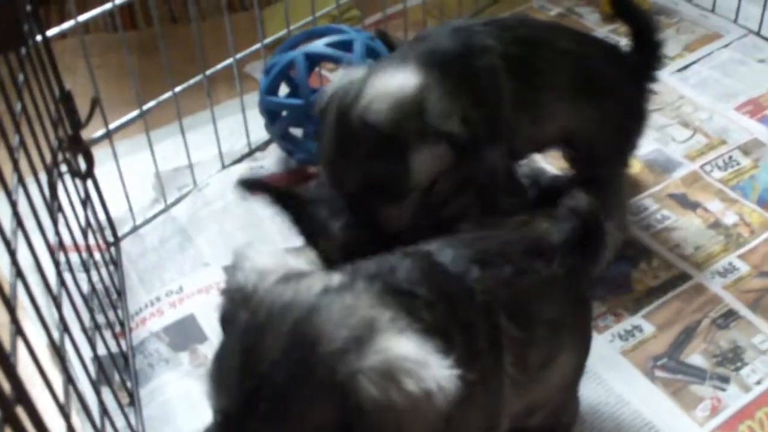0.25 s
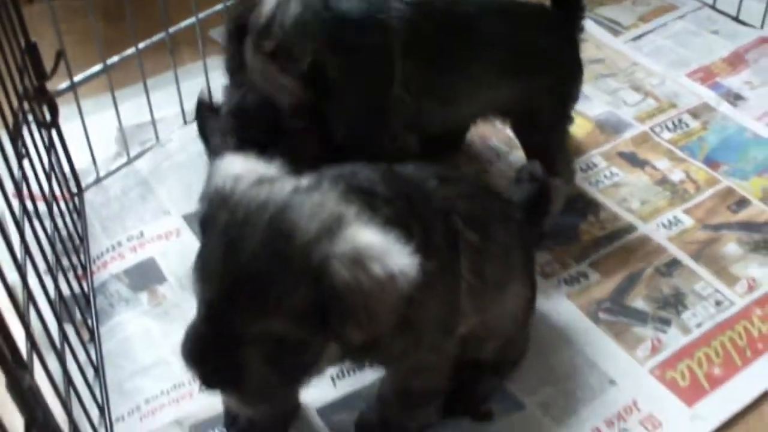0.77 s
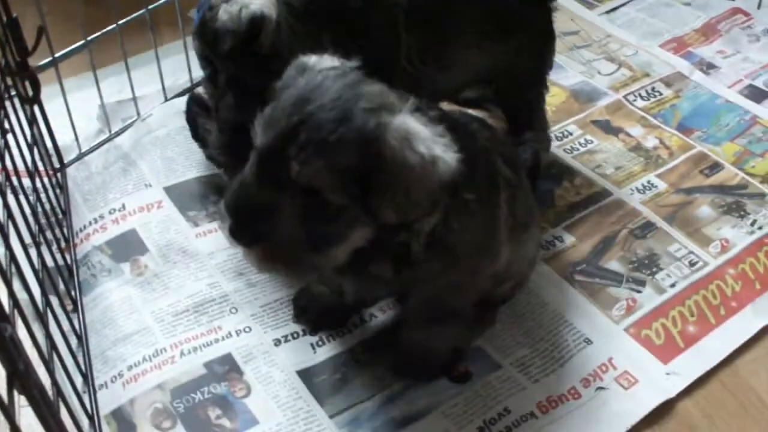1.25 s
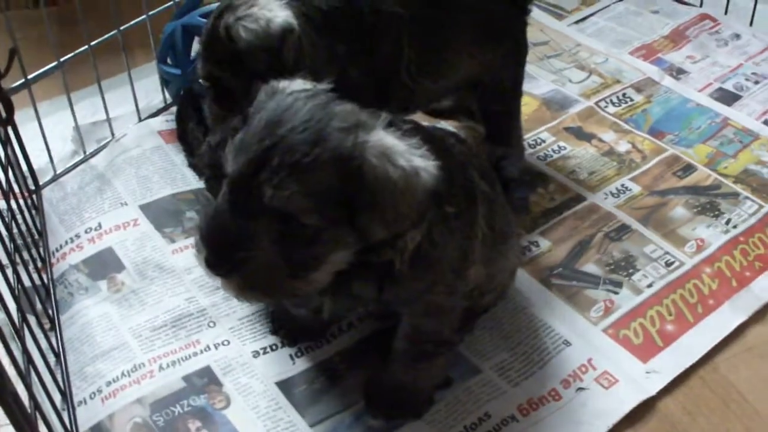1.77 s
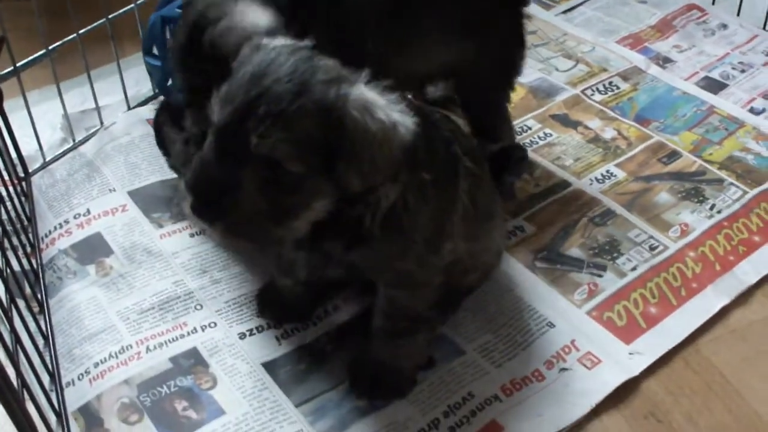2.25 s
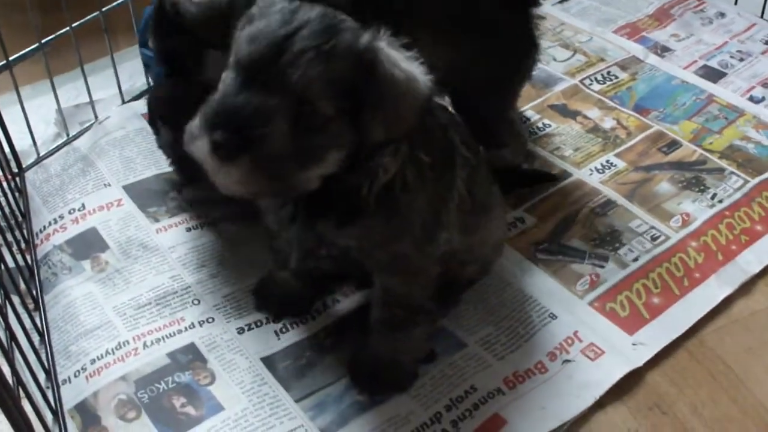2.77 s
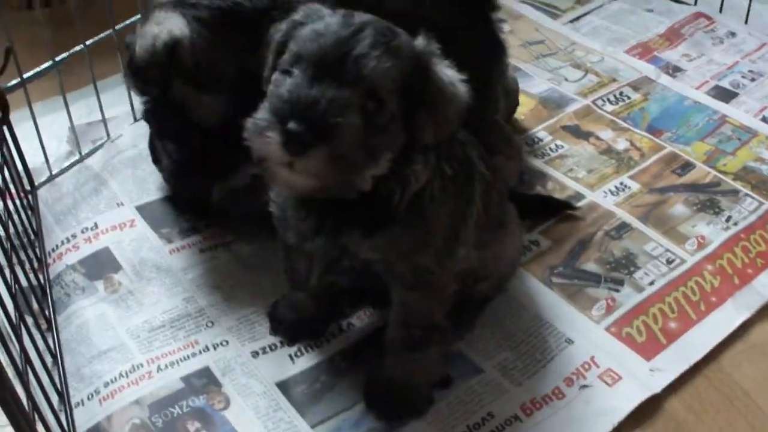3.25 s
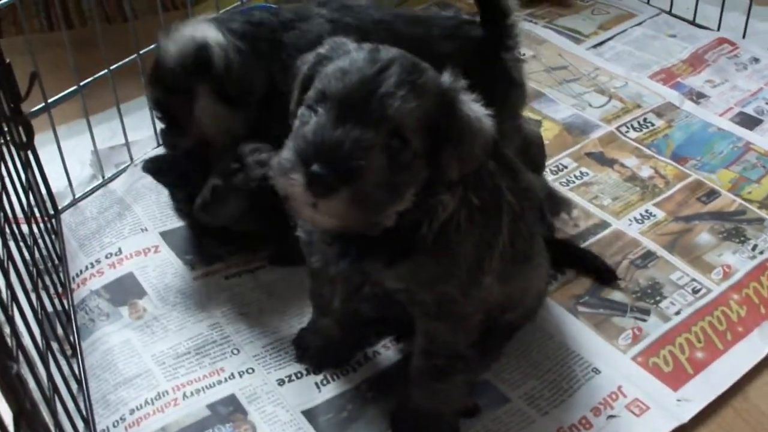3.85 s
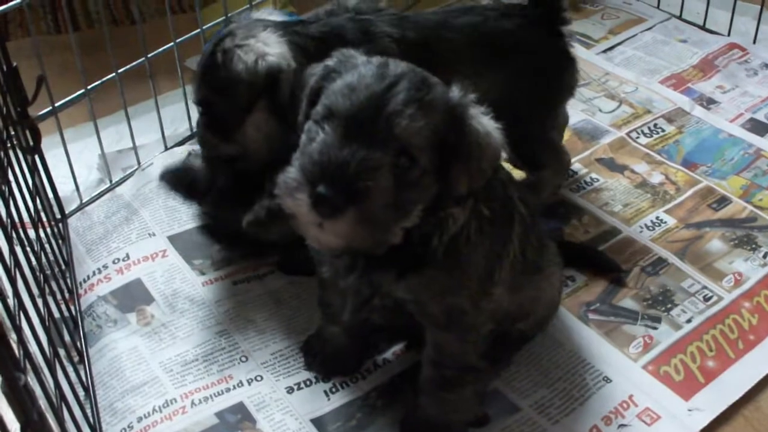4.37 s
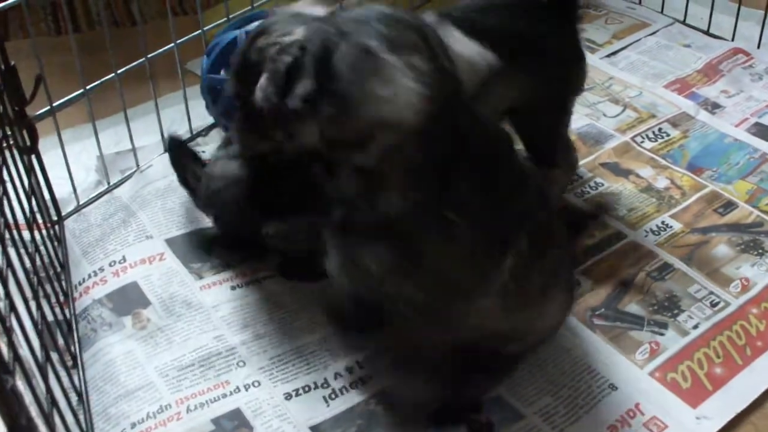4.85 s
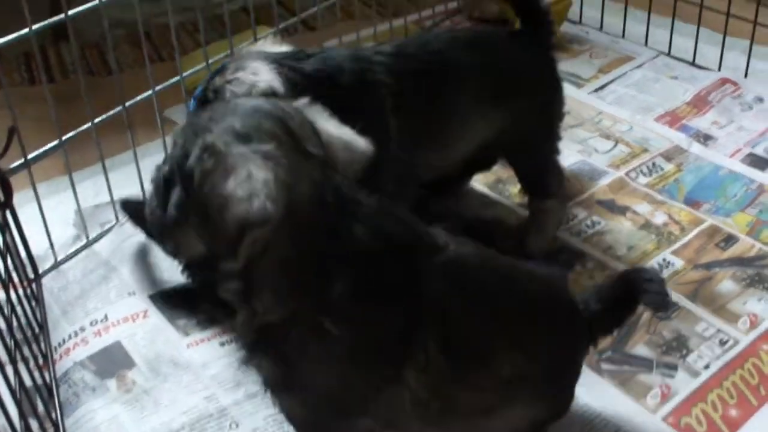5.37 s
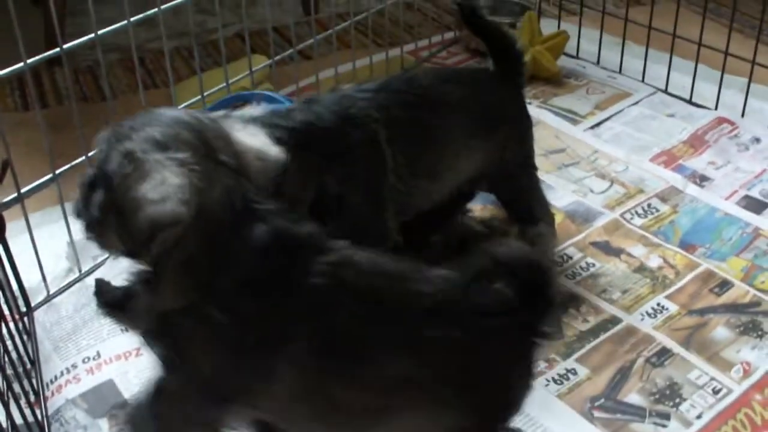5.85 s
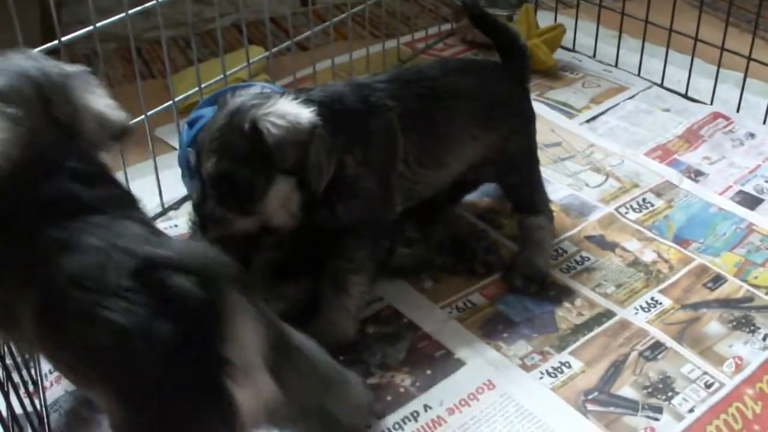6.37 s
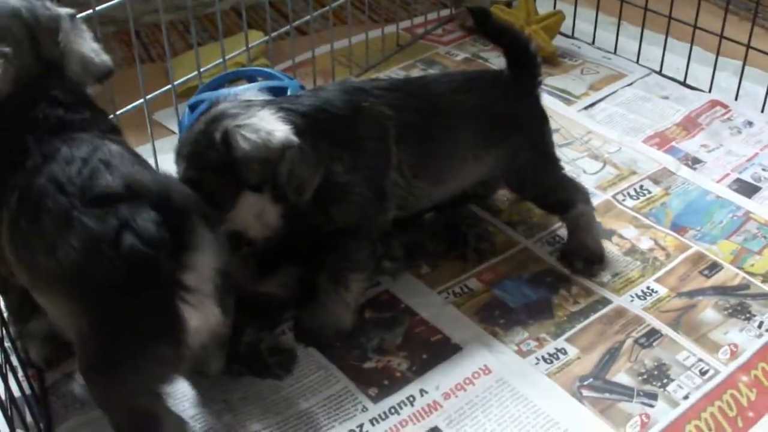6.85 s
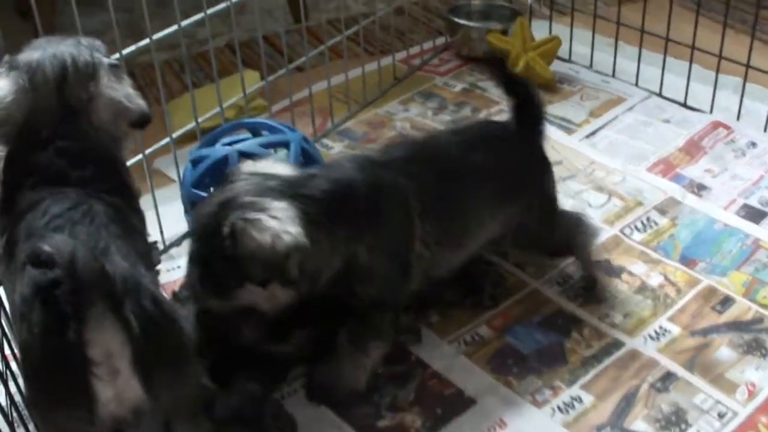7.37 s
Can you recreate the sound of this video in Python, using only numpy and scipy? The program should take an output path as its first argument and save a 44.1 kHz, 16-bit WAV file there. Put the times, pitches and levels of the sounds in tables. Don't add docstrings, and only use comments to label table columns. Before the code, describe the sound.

Steady soft hiss with a barely audible high whine runs throughout, from a small stereo camera in a small hard-floored room. At 0 to 0.4 seconds, light claw ticks and paper rustle; more ticks and scuffing around 0.8 to 1.0. A puppy's thin squeal jumps up in pitch at 1.25, wavers and turns rough by 1.5. Quiet paper sounds follow, with claw ticks and a paw knock near 2.3. A tiny rough squeal comes at 2.7. Paper crinkles from 3.0, strongest near 3.7, with small taps around 4. A sharp, bright yelp at 4.65 is followed by a lower, breathier one at 5.03. A distinct paper scuff sounds at 5.4. From 5.9 paws knock more often; a short hoarse yelp falls at 6.2. Quick knocks, ticks and drags continue through 7.1, ending with crisp crinkles at 7.35 and 7.6.

```python
import sys
import numpy as np
from scipy import signal
from scipy.fft import rfft, irfft
from scipy.io import wavfile
from scipy.ndimage import uniform_filter1d

SR = 44100
rng = np.random.default_rng(int(sys.argv[2]) if len(sys.argv) > 2 else 0)


def level_to_linear(level):
    exponent = np.asarray(level, float) / 20
    return 10 ** exponent


def to_wav(s):
    ch = np.atleast_2d(s).T
    pcm = np.round(np.clip(ch, -1, 1) * 32767)
    wavfile.write(sys.argv[1], SR, pcm.astype(np.int16))


N = 335452
TIME = np.arange(N) / SR

# (frequency [Hz], density [dB per Hz])
MOUTH = [(2500, 5), (3500, -19), (4500, -1.5), (5500, 3), (6500, 7.5), (7500, -1.5), (9000, -4.5),
         (11500, -14), (14000, -43)]
# (low [Hz], high [Hz])
SCUFF_BANDS = [(220, 1100), (900, 1800), (1600, 2900), (3800, 11800)]


def rms_one(x):
    return x / np.sqrt(np.mean(x ** 2) + 1e-20)


def at_hz(points, hz):
    points_hz, points_db = np.transpose(points)
    return np.interp(np.log(hz), np.log(points_hz), points_db)


def band(x, low_hz, high_hz):
    return signal.sosfilt(signal.butter(2, [low_hz, high_hz], "band", fs=SR, output="sos"), x)


def coloured(white, spectrum):
    hz = np.fft.rfftfreq(N, 1 / SR) + 1
    return irfft(rfft(white) * level_to_linear(at_hz(spectrum, hz)), N)


def drift(rate_hz, size):
    pole = np.exp(-2 * np.pi * rate_hz / SR)
    white = rng.standard_normal(size + 4000)
    return rms_one(signal.lfilter([1], [1, -2 * pole, pole * pole], white)[4000:])


def puppies():
    # (time [s], pitch [Hz], fundamental [dB], overtones let out by the open mouth [dB])
    long_squeal = [(1.238, 827, -60, -76), (1.249, 855, -44.5, -63), (1.259, 1099, -42.5, -59.5),
                   (1.275, 1151, -35.5, -52), (1.298, 1173, -46.5, -57), (1.35, 1134, -30, -49.5),
                   (1.422, 1127, -35.5, -54), (1.436, 1069, -37.5, -51.5), (1.512, 1085, -40.5, -54.5)]
    short_squeal = [(2.7, 1310, -53, -72), (2.712, 1314, -45, -50), (2.723, 1243, -38, -51.5),
                    (2.736, 1128, -34.5, -50), (2.745, 1207, -36, -47), (2.757, 1250, -35.5, -56),
                    (2.763, 1200, -52, -54), (2.772, 1210, -53, -66)]
    sharp_yelp = [(4.649, 1578, -60, -70), (4.656, 1565, -28.5, -58), (4.66, 1513, -33, -50),
                  (4.665, 1275, -41, -44), (4.692, 1264, -31.5, -39.5), (4.712, 1346, -40, -45.5),
                  (4.727, 1297, -28, -46), (4.735, 1155, -41, -56), (4.739, 1250, -56, -69)]
    low_yelp = [(5.027, 1100, -52, -60), (5.033, 1036, -38.5, -62), (5.038, 845, -42, -56),
                (5.044, 811, -37.5, -53.5), (5.061, 799, -40, -53), (5.066, 848, -36, -60),
                (5.073, 970, -59, -62)]
    falling_yelp = [(6.192, 1113, -62, -66), (6.196, 1127, -38.5, -71), (6.207, 979, -36, -50),
                    (6.221, 836, -41.5, -55.5), (6.235, 938, -44, -59), (6.244, 884, -40.5, -62),
                    (6.249, 890, -64, -82)]
    brightness_db = [
        1,
        -0.5,
        -6.5,
        3,
        -2,
    ]
    # (share while folds close [0-1], share once they tire [0-1], tiring time [s])
    breaths = [
        (.12, .4, 1.4),
        (.3, .5, 2.69),
        (.15, .35, 4.69),
        (.7, .8, 5.02),
        (.75, .85, 6.19),
    ]
    breath_noise = rms_one(coloured(rng.standard_normal(N), [(1500, -1)] + MOUTH))
    hoarse = rms_one(band(rng.standard_normal(N), 1510, 2340))
    chance = np.array([throb(), drift(160, N), drift(99, N), hoarse])
    calls = long_squeal, short_squeal, sharp_yelp, low_yelp, falling_yelp
    out = np.zeros(N)
    for rows, bright_db, breath in zip(calls, brightness_db, breaths):
        out += call(rows, bright_db, breath, breath_noise, chance)
    return out


def call(rows, bright_db, breath, breath_noise, chance):
    # (time [s], length [s], pitch drop [Hz], level drop [dB])
    dips = [
        (1.312, 0.01, -2, 10.5),
        (1.38, .01, 26, 7.5),
        (1.409, 0.0078, 10.5, 5),
        (1.466, .018, 35.5, 1),
        (1.503, 0.0039, 35, 20),
        (2.745, 0.0038, 12, 11),
        (6.234, 0.0052, 28, 6),
    ]
    # (frequency [Hz], level over overtones [dB])
    second_boost = [(1600, 8.5), (2300, 2.5), (2560, -7), (2700, -19.5)]
    release_s, attack_s, tiring_s = 0.0092, 0.0055, 0.07
    s, *columns = np.transpose(rows)
    span = slice(int(s[0] * SR), int((s[-1] + 4 * release_s) * SR))
    t = TIME[span]
    swing, waver, flicker, hoarse = chance[:, span]

    pitch_hz, first_db, open_db = [np.interp(t, s, c) for c in columns]
    for when_s, length_s, drop_hz, drop_db in dips:
        dip = np.exp(-((t - when_s) / length_s) ** 2)
        pitch_hz = pitch_hz - drop_hz * dip
        first_db = first_db - drop_db * dip
    second_db = open_db + at_hz(second_boost, 2 * pitch_hz)
    upper_db = open_db + bright_db
    closing_share, tired_share, tires_s = breath
    breathy = np.interp(t, [tires_s, tires_s + tiring_s], [closing_share, tired_share])
    pitch_hz = uniform_filter1d(pitch_hz, size=90) * (1 + 0.02 * breathy * waver)
    phase = 2 * np.pi * np.cumsum(pitch_hz) / SR
    shimmer = level_to_linear(3 * breathy * flicker)

    first = level_to_linear(first_db) * np.sin(phase) * (1 + 0.43 * swing)
    second = level_to_linear(second_db + 8.5) * np.sin(2 * phase + 2.8) * (1 + swing)
    gains = [level_to_linear(at_hz(MOUTH, k * pitch_hz)) for k in range(3, 13)]
    upper = sum(g * np.sin(k * phase + k * k * 0.418) for k, g in enumerate(gains, 3))
    upper = upper / np.sqrt(sum(g ** 2 for g in gains[2:]) / 2)
    puffs = breath_noise[span] * (1 + 0.6 * np.sin(phase))
    top = np.sqrt(1 - breathy) * upper * (1 + 0.61 * swing) + np.sqrt(breathy) * puffs
    top = level_to_linear(upper_db + 1.0) * top
    rasp = level_to_linear(second_db + 0.5) * breathy * hoarse

    attack = np.clip((t - t[0]) / attack_s, 0, 1)
    release = np.exp(-np.maximum(t - s[-1], 0) / release_s)
    out = np.zeros(N)
    out[span] = (np.sqrt(2) * (first + second) * shimmer + top + rasp) * attack * release
    return out


def throb():
    # (start [s], end [s], throb [Hz], depth [0-1])
    flutter = [
        (1.437, 1.53, 86, 0.37),
        (2.707, 2.743, 283.8, 0.68),
        (4.661, 4.697, 470, 0.5),
        (6.194, 6.25, 204, 0.2),
    ]
    swing = np.zeros(N)
    for start_s, end_s, hz, depth in flutter:
        fade = np.clip(np.minimum(TIME - start_s, end_s - TIME) / 0.0033, 0, 1)
        phase = 2 * np.pi * np.cumsum(hz * (1 + 0.15 * drift(60, N))) / SR
        swing += depth * fade * np.sin(phase)
    return swing


def taps():
    # (low [Hz], high [Hz], t60 [s], first contact over rattle [ratio])
    parts = [
        (250, 1000, .025, 6),
        (900, 2700, .009, 9),
        (5200, 10500, .007, 2),
    ]
    # (time [s], tick [dB], left-right [dB])
    claws = [(0.032, -47, -2), (0.1308, -39.5, -3), (0.1406, -40.5, -8), (0.1824, -47, -3),
             (0.1882, -43, -3), (0.8466, -45, -1), (2.2482, -39, -5), (2.261, -40.5, -1), (3.954, -40, -4),
             (4.5383, -48, -7), (4.8445, -47, 5), (5.937, -41.5, -1), (6.706, -42, 0), (7.0591, -34.5, 11),
             (7.152, -52, 0)]
    # (time [s], knock [dB], weight [dB], claw [dB])
    paws = [(0.0946, -51, 10.5, -1), (0.8157, -39.5, -1.5, -9), (0.8973, -50, 11.5, -10.5),
            (1.1598, -45, 0, 2), (2.308, -48, 2, -7), (3.9729, -49, 10, -8), (3.9882, -57, 13.5, 8),
            (4.1623, -44, 1, -15), (4.728, -40, -0.5, 3.5), (4.763, -34, -20, -8), (5.0104, -40, -11, -8),
            (5.4307, -37.5, -17, -8), (5.858, -46.5, 1, -14), (5.888, -45.5, 3.5, -2), (5.9781, -36, -5, 0),
            (6.1731, -38, 2, 0.5), (6.225, -31, -2.5, -6), (6.4444, -43, -6, -2), (6.615, -36.5, -7, -7),
            (6.6909, -34.5, -8, -5), (6.757, -31, -11.5, -13), (6.8171, -42, 3, -9),
            (6.933, -36.5, -14, -8), (7.0512, -36.5, 2, -20), (7.0596, -33.5, -4, -5.5),
            (7.137, -33.5, -15, -6), (7.601, -33.5, -9, -10)]
    thud_rel_db, knock_rel_db = -29.5, -7.5
    rows = [(s, db, db + thud_rel_db, db + knock_rel_db, pan_db) for s, db, pan_db in claws]
    rows += [(s, db + claw_db, db + weight_db, db, 0) for s, db, weight_db, claw_db in paws]
    size = 2000
    out, t = np.zeros((2, N + size)), np.arange(size) / SR
    noise = rng.standard_normal((len(rows), 3, size))
    for (s, tick_db, thud_db, knock_db, pan_db), draws in zip(rows, noise):
        start = round(s * SR)
        pan = level_to_linear(np.array([[0.5], [-0.5]]) * pan_db)
        levels_db = thud_db, knock_db, tick_db
        for level_db, (low_hz, high_hz, t60_s, contact), white in zip(levels_db, parts, draws):
            strike = (white + contact * (t == 0)) * level_to_linear(-60 * t / t60_s)
            burst = band(strike + 1e-18, low_hz, high_hz)
            burst = level_to_linear(level_db - 1.5) * burst / np.max(np.abs(burst))
            out[:, start:start + size] += burst * pan
    return out[:, :N]


def scuffs():
    sizes = level_to_linear(3.24 * np.minimum(rng.exponential(1, (2, N)), 5)) * rng.choice([-1, 1], (2, N))
    slips_per_s = 5000 * level_to_linear(3.0 * drift(40, N))
    slips = sizes * (rng.random((2, N)) < slips_per_s / SR)
    slips = slips + 0.48 * slips[::-1]
    out = np.zeros((2, N))
    for pressure, edges_hz in zip(presses(), SCUFF_BANDS):
        out += pressure * rms_one(band(band(slips, *edges_hz), *edges_hz))
    return out


def presses():
    # (time [s], length [s], level [dB], fineness [0 body - 3 hiss])
    crinkles = [(0.365, .14, -54, 1.9), (0.842, .08, -55.5, 2.48), (0.99, 0.024, -53, 2.43),
                (2.258, .04, -67, 3.0), (2.432, .08, -60.5, 2.5), (3.09, 0.11, -61, 2.56),
                (3.42, .09, -55.5, 2.32), (3.678, .07, -49, 1.62), (3.984, 0.095, -53.5, 2.13),
                (4.548, .04, -64, 3.8), (5.31, 0.047, -50, 2.3), (5.582, .06, -55.5, 2.38),
                (6.174, 0.036, -49.5, 2.6), (7.142, 0.094, -50.5, 2.2), (7.347, .045, -43.5, 2.04),
                (7.432, 0.24, -55, 2.41), (7.607, 0.038, -43, 2.0)]
    # (time [s], length [s], level [dB], fineness [0 body - 3 hiss])
    drags = [(0.06, 0.15, -63, 0.64), (0.268, .1, -67, .1), (0.8, 0.13, -60, 1.8), (1.028, 0.3, -61, 0.14),
             (1.2, 0.11, -66, .8), (1.68, .12, -65, .8), (2.004, 0.056, -60, .1),
             (2.332, 0.038, -59.5, 0.49), (2.67, .04, -75, .3), (3.116, 0.089, -69, .2),
             (3.55, .1, -65.5, .2), (4.05, 0.15, -64, 0.72), (4.18, 0.071, -64, 0.91),
             (4.268, 0.09, -62.5, 0.12), (4.914, 0.042, -75, .5), (5.015, 0.043, -56.5, 1.4),
             (5.428, 0.037, -45.5, 0.74), (5.78, 0.098, -68, 1.8), (5.922, 0.06, -56.5, 0.61),
             (5.99, 0.16, -59, 1.3), (6.25, 0.16, -56.5, 1.9), (6.5, 0.24, -62, 2.2),
             (6.64, 0.14, -57, 1.2), (6.7, 0.044, -58.5, 2.2), (6.758, 0.14, -55, 1.34),
             (6.9, 0.028, -60, .2), (6.945, 0.1, -50.5, 1.08), (7.056, 0.077, -54.5, 2.2),
             (7.33, 0.21, -61.5, 0.17), (7.5, 0.29, -63.5, 0.93)]
    restless_db = [
        -70,
        -74.5,
        -86,
        -106.5,
    ]
    rise_share, fade_db = 0.3, 13.5
    t, ranges = TIME[::64], np.arange(len(SCUFF_BANDS))[:, None]
    power = level_to_linear(2 * (np.array(restless_db)[:, None] + 3.9 * drift(200, len(t))))
    for table, focus_db in ((crinkles, 14.5), (drags, 3)):
        for s, length_s, db, fineness in table:
            away = np.maximum((s - t) / rise_share, (t - s) / (1 - rise_share)) / max(length_s, 0.01)
            press_db = db - fade_db * away ** 0.98 - focus_db * (ranges - fineness) ** 2
            power = power + level_to_linear(2 * press_db)
    return [uniform_filter1d(np.interp(TIME, t, np.sqrt(p)), size=450) for p in power]


def room(x):
    t60_s, level_db, wall_cut_hz = 0.23, -15.5, 1740
    high_t60_s = t60_s * 0.43
    t = np.arange(SR // 2) / SR
    shared, own = rng.standard_normal(len(t)), rng.standard_normal((2, len(t)))
    onset = np.clip((t - 0.004) / 0.0095, 0, 1)
    tail = (shared + 0.5 * own) * level_to_linear(-60 * t / t60_s) * onset
    dull = signal.lfilter(*signal.butter(2, wall_cut_hz, fs=SR), tail)
    tail = dull + 0.88 * (tail - dull) * level_to_linear(-60 * t / high_t60_s)
    tail = signal.lfilter(*signal.butter(1, 2 * wall_cut_hz, fs=SR), tail)
    tail = tail / np.sqrt(np.sum(tail ** 2, axis=1, keepdims=True))
    return level_to_linear(level_db) * signal.fftconvolve(np.atleast_2d(x), tail, axes=1)[:, :N]


def hiss():
    # (frequency [Hz], density [dB per Hz])
    hiss_spectrum = [(20, -33), (60, -24.5), (130, -7), (220, 1), (550, 4.5), (1200, 0), (2100, -2),
                     (4000, -21), (6000, -11), (9800, -16.5), (11400, -28), (11900, -50), (12700, -38),
                     (13500, -40.5)]
    # (frequency [Hz], correlation [-1 to 1])
    likeness = [(60, -0.27), (220, -0.56), (810, -0.48), (2970, -0.11), (10900, -0.069)]
    # (frequency [Hz], level [dB rms])
    whine_tones = [(7800, -86), (7827, -79.5)]
    hz = np.fft.rfftfreq(N, 1 / SR) + 1
    alike = np.clip(at_hz(likeness, hz), -1, 1)
    mid, side = rfft(coloured(rng.standard_normal((2, N)), hiss_spectrum))
    noise = irfft(np.sqrt(1 + alike) * mid + np.sqrt(1 - alike) * side * [[1], [-1]], N)
    whine = np.zeros(N)
    for tone_hz, db in whine_tones:
        whine += np.sqrt(2) * level_to_linear(db + 2.5 * drift(6, N)) * np.sin(2 * np.pi * tone_hz * TIME)
    return level_to_linear(-54.5) * rms_one(noise) + whine


def scene():
    voices = puppies() * level_to_linear(np.array([[-0.3], [0.3]]))
    claws = taps()
    pen = voices + claws + room(voices + 0.91 * claws) + scuffs()
    bass_cut = signal.butter(3, 253, "high", fs=SR, output="sos")
    top_cut = signal.cheby2(8, 22, 10800, fs=SR, output="sos")
    return signal.sosfilt(top_cut, signal.sosfilt(bass_cut, pen)) + hiss()


def low_pass(x):
    return signal.sosfilt(signal.butter(12, 14050, fs=SR, output="sos"), x)


def record(dry):
    # (frequency [Hz], width [Hz])
    notches = [(3010, 1270), (4020, 520), (5020, 900)]
    core_width_hz = 150
    for hz, width_hz in notches:
        dry = signal.lfilter(*signal.iirnotch(hz, hz / width_hz, fs=SR), dry)
        dry = signal.lfilter(*signal.iirnotch(hz, hz / core_width_hz, fs=SR), dry)
    return low_pass(dry)


dry = scene()
out = record(dry)
to_wav(out)
```